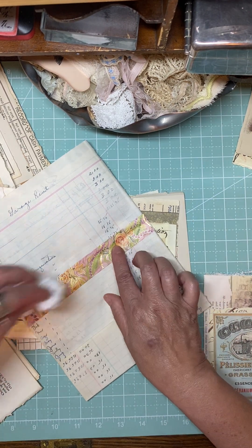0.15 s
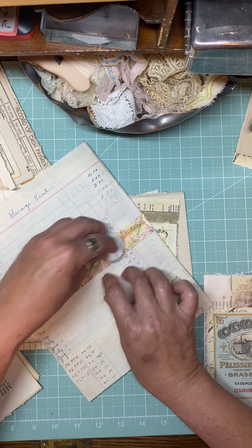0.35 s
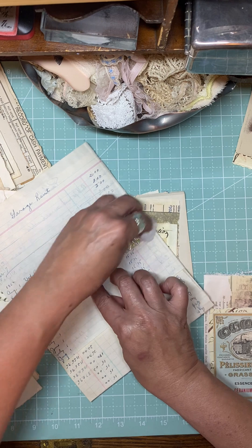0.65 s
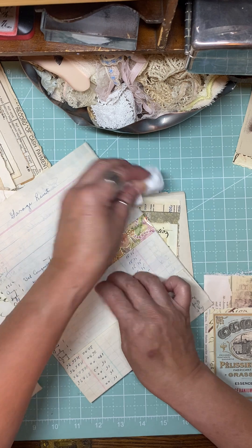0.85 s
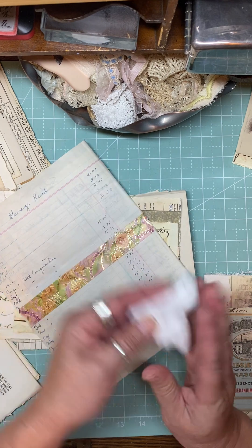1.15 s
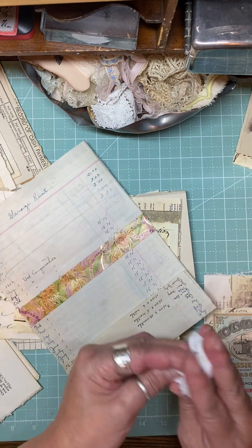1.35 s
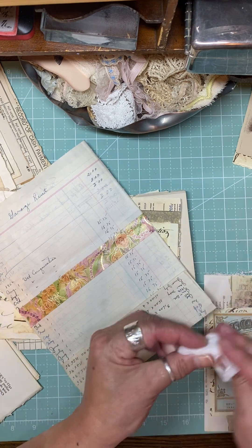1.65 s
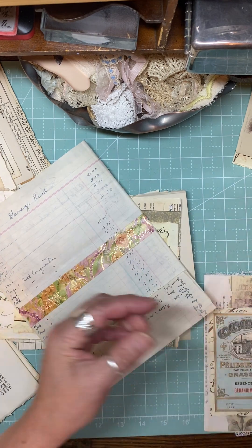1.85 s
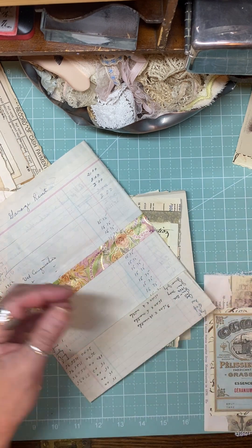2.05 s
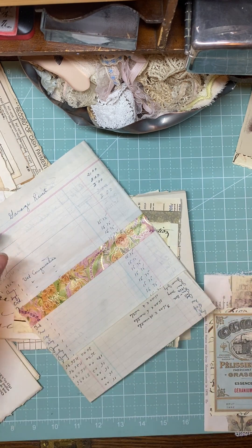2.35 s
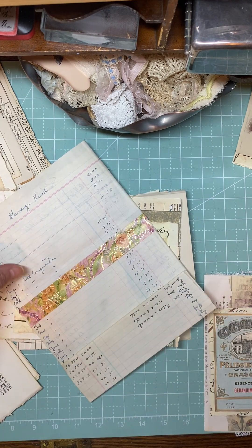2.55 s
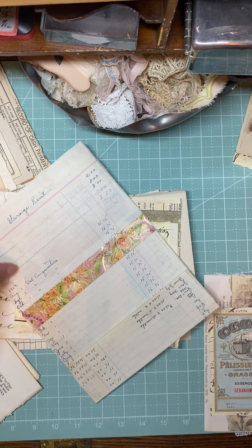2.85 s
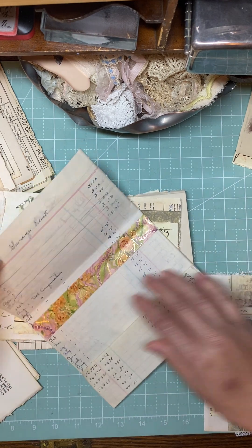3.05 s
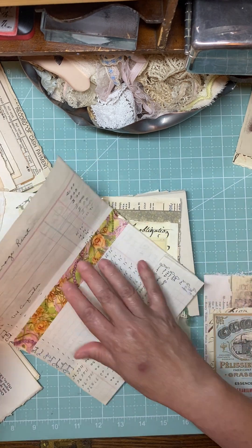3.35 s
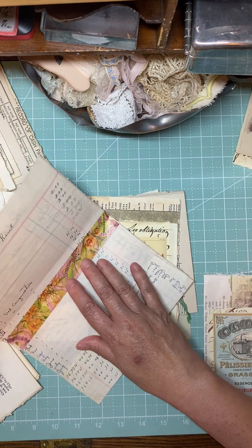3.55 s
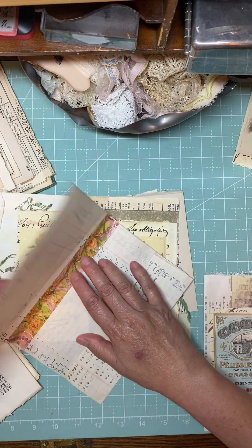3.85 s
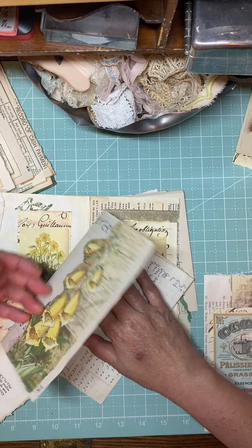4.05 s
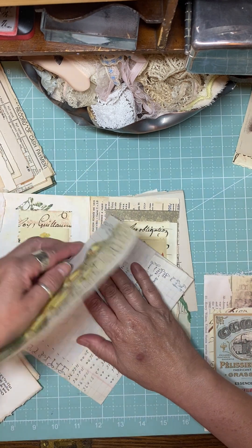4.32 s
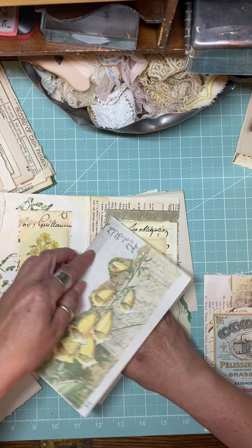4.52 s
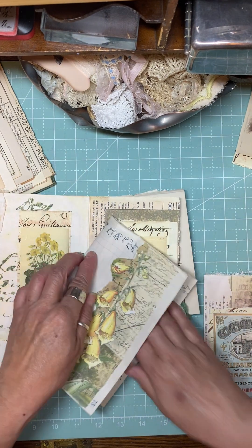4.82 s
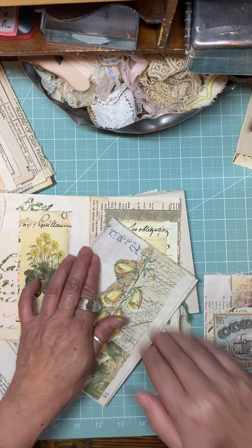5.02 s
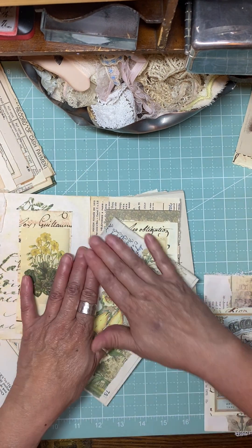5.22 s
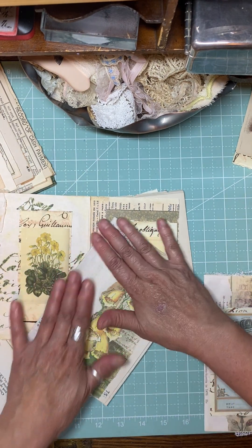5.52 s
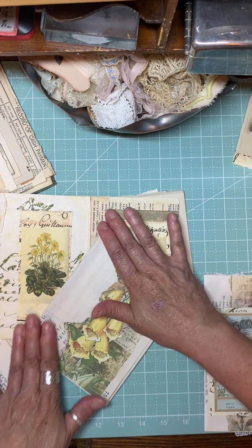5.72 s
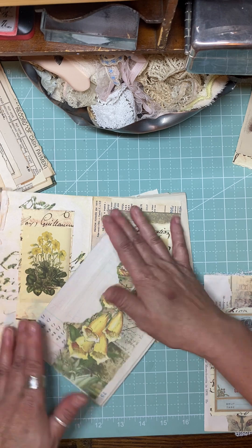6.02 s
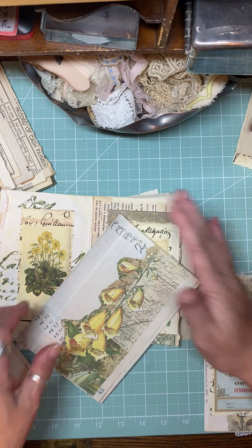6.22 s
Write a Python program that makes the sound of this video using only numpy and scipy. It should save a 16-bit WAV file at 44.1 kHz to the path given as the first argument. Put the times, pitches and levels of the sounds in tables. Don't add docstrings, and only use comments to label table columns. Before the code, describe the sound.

Dry, intimate handling of a stiff paper sheet on a cutting mat, recorded very near. Wiping scrapes and light knocks come first, then tiny cloth rustles and a lull with low fan hum. Crisp crackling rises as the page is lifted and folded, with dull air flaps, crease ticks and two sudden loud cracks, easing into long soft hand strokes that fade out.

```python
import sys
import numpy as np
from scipy import signal
from scipy.fft import rfft, irfft, next_fast_len
from scipy.io import wavfile
from scipy.ndimage import uniform_filter1d, map_coordinates

SR = 44100
rng = np.random.default_rng(int(sys.argv[2]) if len(sys.argv) > 2 else 0)


def generate_wav(sig):
    pcm = np.round(np.clip(np.atleast_2d(sig).T, -1, 1) * 32767).astype(np.int16)
    wavfile.write(sys.argv[1], SR, pcm)


def decibels_to_gain(level_db):
    exponent = np.asarray(level_db, float) / 20
    return 10 ** exponent


N = 281358

# pitch_hz, level_db (per Hz)
FLAP = [(300, -20), (500, -1), (800, 0), (1100, -11), (2000, -46)]
# full_speed_s, swell_s, fade_s, flutter_db, deep_push_db (re flutter)
SWINGS = [(.09, 0.096, 0.042, -69.5, -9), (.31, .03, .04, -70, -6), (.41, .01, .03, -66, 0),
          (.51, .04, .03, -66, -6), (.78, .06, .04, -66, -6), (.91, .04, .06, -70, -6),
          (.56, 0.042, 0.05, -65, -6), (2.21, 0.044, 0.067, -82, 24.5), (2.77, 0.073, 0.05, -67.5, 3),
          (2.99, 0.11, .1, -73.5, -5), (3.228, 0.06, 0.12, -63.5, -2), (3.49, 0.12, 0.085, -66.5, 7.5),
          (3.89, .03, .03, -65, -6), (4.045, .04, .03, -61, -3), (4.11, .03, .07, -66, -3),
          (4.255, .03, .04, -69, 0), (3.934, 0.01, 0.032, -53, 4), (3.975, 0.015, 0.04, -59.5, -3),
          (4.295, 0.01, .055, -55.5, 9), (4.335, 0.035, 0.032, -48.5, 2.5), (4.41, .06, 0.074, -66, -7.5),
          (4.52, 0.011, 0.053, -43, -9), (4.626, 0.017, 0.23, -60.5, -6.5), (4.7, 0.079, .03, -57.5, 4),
          (4.72, 0.009, 0.019, -43.5, -9), (4.8, 0.0086, 0.048, -56, -0.5), (4.85, 0.032, 0.17, -58.5, -5),
          (5.11, 0.11, 0.1, -62.5, -8), (5.25, 0.025, 0.12, -67, 6), (6.24, .08, 0.11, -72, -5.5)]


def unit(x):
    return x / np.sqrt(np.mean(x ** 2) + 1e-20)


def along(points, hz):
    f, v = np.transpose(points)
    return np.interp(np.log(hz + 1), np.log(f + 1), v)


def curves(rows):
    s, *cols = np.transpose(rows)
    return [np.interp(np.arange(N) / SR, s, c, -120, -120) for c in cols]


def wobble(rate):
    knots = rng.standard_normal(int(N * rate / SR) + 4)
    return map_coordinates(knots, [np.arange(N) * rate / SR])


def filtered(x, response):
    m = next_fast_len(N + SR // 2)
    return irfft(rfft(x, m) * response(np.fft.rfftfreq(m, 1 / SR)), m)[..., :N]


def colour(points):
    return lambda hz: decibels_to_gain(along([(0.92, -120)] + list(points), hz))


def resonances(modes):
    def response(f):
        total = 0
        for k, (centre, width, db) in enumerate(modes):
            damping = 1j * f * width
            total = total + (-1) ** k * decibels_to_gain(db) * damping / (centre * centre - f * f + damping)
        return total
    return response


def strokes(rows):
    s, swell, fade, db, companion_db = np.transpose(rows)[:, :, None]
    t = np.arange(0, N + 64, 64) / SR
    away = np.where(t < s, (s - t) / swell, (t - s) / fade).clip(0)
    gain = decibels_to_gain(db - 20 * away ** 1.48)
    layers = (gain, gain * decibels_to_gain(companion_db))
    return np.array([np.interp(np.arange(N) / SR, t, g.sum(axis=0)) for g in layers])


def slips(rate, spread_db, clump_db, patchy_db=0.5):
    slipping = rng.random(N) < rate / SR
    size = slipping * decibels_to_gain(spread_db * np.minimum(rng.exponential(size=N), 3))
    grains = (1 + size) * decibels_to_gain(clump_db * wobble(45)) * rng.standard_normal((2, N))
    z = signal.stft(grains, nperseg=512)[2]
    field = uniform_filter1d(rng.standard_normal(z.shape[1:]), size=7, axis=0)
    field = uniform_filter1d(field, size=12, axis=1)
    return signal.istft(z * decibels_to_gain(patchy_db * unit(field)), nperseg=512)[1][:, :N]


def hands():
    # pitch_hz, level_db (per Hz)
    fibres = [(1000, -30), (2000, -11), (3500, -4.5), (5000, -1), (7000, 0), (10000, -1), (12500, -3.5),
              (15500, 2.5)]
    # pitch_hz, width_hz, level_db
    sheet = [(2300, 1510, 1.5), (3223, 3700, 0.5), (5920, 3400, -5.5)]
    # pitch_hz, width_hz, level_db
    gap = [(1400, 1500, 0)]
    # full_speed_s, swell_s, fade_s, hiss_db, pressure_db (crackle re hiss)
    wiping = [(.05, 0.98, 0.14, -60.5, -1), (.28, 0.18, 0.18, -91.5, 19), (.4, 0.14, 0.26, -59, -0.5),
              (.8, .06, .09, -67, 2)]
    crumpling = [(1.22, 0.072, 0.15, -72.5, -4), (1.37, 0.072, 0.16, -78.5, 3.5),
                 (1.57, 0.056, 0.14, -68, -5.5), (1.69, 0.027, 0.031, -67.5, -2),
                 (1.87, 0.093, 0.069, -70.5, 0), (1.97, 0.065, 0.03, -73.5, 6),
                 (2.09, 0.038, .14, -65.5, -4)]
    lifting = [(2.69, 0.03, .05, -63, -27), (2.73, 0.013, 0.028, -63, 5.5), (2.78, 0.03, 0.053, -49, -6),
               (2.91, 0.063, 0.22, -48, -8), (3.1, 0.25, 0.17, -73, 13.5), (3.21, 0.1, 0.027, -54.5, -5),
               (3.33, 0.15, 0.026, -55.5, -1.5), (3.435, 0.0038, 0.11, -59, 3.5),
               (3.49, 0.058, 0.069, -52, 2.5), (3.55, 0.11, 0.062, -55, -2),
               (3.92, 0.029, 0.02, -50.5, 1.5), (4.04, 0.49, 0.055, -74, 9)]
    folding = [(4.16, 0.0087, 0.27, -63, -8), (4.32, 0.11, 0.07, -65, 10.5), (4.44, 0.067, 0.09, -84, 13),
               (4.52, 0.0092, 0.19, -64.5, 3.5), (4.64, 0.022, 0.13, -61, 1.5),
               (4.71, 0.13, 0.4, -58, -0.5), (4.78, 0.12, 0.083, -51.5, -2.5), (4.9, 0.2, 0.04, -57.5, 12),
               (4.955, .07, 0.074, -71.5, 8), (5.02, 0.083, .1, -70, 6.5), (5.08, 0.066, 0.068, -60.5, 3)]
    smoothing = [(5.22, 0.091, .1, -75, 4.5), (5.28, 0.032, 0.063, -50.5, -8), (5.46, 0.087, 0.24, -49, -5),
                 (5.6, 0.15, 0.15, -47.5, -9.5), (5.93, 0.07, 0.054, -76.5, 8.5),
                 (6.06, 0.1, 0.085, -54, -5.5), (6.28, 0.12, 0.37, -87.5, 10)]
    pressing = [(.57, 0.08, 0.5, -61.5, -5.5), (.84, 0.58, 0.012, -57, -3.5), (.7, 0.05, 0.16, -61.5, -12),
                (1.04, 0.53, 0.17, -86, 19), (3.76, 0.065, 0.093, -72, -2.5),
                (5.72, 0.17, 0.071, -54.5, -9.5), (5.8, 0.2, 0.038, -63, 2.5)]
    actions = [(wiping, -0.5), (crumpling, -14), (lifting, -3.5),
               (folding, -0.5), (smoothing, -1.7), (pressing, -7.5)]
    moves = [(strokes(rows), gap_db) for rows, gap_db in actions]
    speed, pressure = sum(move for move, _ in moves)
    air = sum(decibels_to_gain(gap_db) * move[1] for move, gap_db in moves)
    air = air + decibels_to_gain(17.5) * strokes(SWINGS)[0] ** 1.355

    def sheet_response(f):
        return resonances(sheet)(f) / (1 + (1500 / (f + 1)) ** 4)

    def gap_response(f):
        return resonances(gap)(f) ** 2 / (1 + (850 / (f + 1)) ** 6)

    hiss = unit(filtered(slips(800, spread_db=4.2, clump_db=0.9, patchy_db=1.5), colour(fibres)))
    crackle = unit(filtered(slips(250, spread_db=5.5, clump_db=1.9, patchy_db=2), sheet_response))
    hollow = unit(filtered(slips(150, spread_db=4, clump_db=2, patchy_db=1.8), gap_response))
    return decibels_to_gain(1.0) * speed * hiss + decibels_to_gain(-5.0) * pressure * crackle + decibels_to_gain(-7) * air * hollow


def fan():
    # pitch_hz, level_db (re main tone)
    motor_tones = [(36.7, -9), (58.8, -0.5), (119, -5.5), (240.5, -13)]
    # time_s, level_db
    motor_level = [(0.0, -56.5), (1.24, -53.5), (1.74, -52.5), (2.54, -52.5), (3.55, -57), (4.42, -56),
                   (4.6, -58.5), (5.26, -53), (5.45, -57.5), (6.1, -55.5), (6.38, -53.5)]
    # pitch_hz, width_hz, level_db
    room_modes = [(36.4, 4.6, -6.5), (57.5, 6.1, -4), (91, 32.5, -10.5), (143.2, 14.4, -8), (182.5, 5, -17),
                  (205.2, 10, -17.5), (250.1, 9.65, -13), (350, 15.8, -17), (390, 21, -22),
                  (497.2, 18.6, -25.5), (600, 11, -44.5)]
    # pitch_hz, level_db (per Hz)
    far_hiss = [(500, 6), (800, -9), (1200, -17), (1800, -30), (2700, -27), (3600, -31.5), (4800, -20.5),
                (6500, -34.5), (9000, -32), (12000, -49.5), (15500, -36)]
    t = np.arange(N) / SR
    tones = 0
    for hz, db in motor_tones:
        strength = decibels_to_gain(db + 2.8 * wobble(9))
        tones = tones + strength * np.sin(2 * np.pi * hz * t + 1.31 * wobble(5.5))
    motor = decibels_to_gain(curves(motor_level)[0] + 1.5) * tones * [[1], [0]]
    air = decibels_to_gain(-53.5) * unit(filtered(rng.standard_normal((2, N)), resonances(room_modes)))
    hiss_colour = colour([(300, -5.5)] + list(far_hiss))
    hiss = decibels_to_gain(-78.0) * unit(filtered(rng.standard_normal((2, N)), hiss_colour))
    return motor + air + hiss


def flaps():
    # pitch_hz, level_db (per Hz)
    push_colour = [(120, -25), (220, -1.5), (350, 0.5), (500, -2), (800, -41.5)]

    def lumps(points):
        return unit(filtered(slips(120, spread_db=4, clump_db=3, patchy_db=3.5), colour(points)))

    flutter, push = strokes(SWINGS)
    return decibels_to_gain(0.5) * flutter * lumps(FLAP) + decibels_to_gain(-3.0) * push * lumps(push_colour)


def taps():
    # time_s, peak_db, pitch_hz
    light_taps = [(0.021, -44, 1610), (0.035, -46, 1290), (0.071, -38.5, 1290), (0.094, -48.5, 635),
                  (0.315, -43.5, 1530), (0.532, -43, 1280), (0.556, -50, 1270), (0.8, -40.5, 1360),
                  (0.837, -43, 1300), (0.896, -43.5, 1330), (0.96, -46, 1170), (2.726, -49, 1380),
                  (2.75, -53, 1020), (3.224, -44, 1160), (3.268, -39.5, 1270), (3.973, -52, 815),
                  (4.018, -54, 630), (4.041, -55, 900), (4.161, -50, 1390), (4.238, -45, 1420),
                  (4.267, -44, 1470), (4.332, -52, 790), (4.682, -40, 1300), (4.046, -50, 1990)]
    # time_s, peak_db, pitch_hz
    knocks = [(0.387, -44, 1400), (0.69, -30, 5520), (0.2435, -43, 4200), (0.244, -48, 1050),
              (0.858, -52, 820), (2.197, -50, 516), (2.22, -47.5, 390), (2.424, -59, 2700),
              (2.434, -60, 2300), (2.452, -59, 2540), (2.462, -64, 2700), (2.477, -65, 2500),
              (3.932, -36.5, 310), (3.938, -40, 477), (4.291, -37.5, 326), (4.537, -38, 500),
              (4.624, -44, 875), (4.323, -38, 440), (4.337, -38, 520), (4.521, -38, 518)]
    t = np.arange(SR // 8) / SR
    out = np.zeros((2, N + len(t)))
    for s, db, hz in list(light_taps) + list(knocks):
        waver = np.cumsum(rng.standard_normal(len(t))) * 0.045
        dull = uniform_filter1d(rng.standard_normal(len(t)), size=int(SR / hz / 4) + 1)
        contact = unit(dull - uniform_filter1d(dull, size=int(SR / hz)))
        tick = decibels_to_gain(db - 14 - 60 * t / 0.0091) * contact
        t60 = 31 / hz
        swell = (1 - np.exp(-t * hz)) * decibels_to_gain(db - 5.5 - 60 * t / t60)
        out[0, round(s * SR):][:len(t)] += swell * np.sin(2 * np.pi * hz * t + waver) + tick
    return out[:, :N]


def scuffs():
    # time_s, length_s, level_db, pitch_hz, width_hz
    flat_scuffs = [(.071, .01, -58, 6000, 6000), (.092, .014, -64, 2400, 1800), (.15, .2, -77, 800, 200),
                   (.585, .13, -72, 830, 200), (.798, .006, -60, 1300, 2200), (.92, .2, -79, 800, 200),
                   (.095, 0.016, -62.5, 1400, 900), (.134, .006, -69, 1720, 1400),
                   (.177, .012, -72, 2000, 1800), (.233, .006, -62, 1700, 1200),
                   (.333, 0.02, -58, 4800, 2570), (.353, .006, -60, 2400, 2000),
                   (.362, .03, -59, 5430, 1200), (.58, .03, -60, 3300, 900), (.735, .075, -58, 5570, 1400),
                   (.838, .005, -49.5, 3930, 900), (.897, .006, -64, 3000, 1000),
                   (.959, .01, -64, 2600, 1200), (.995, .03, -71, 2500, 900), (1.04, 0.044, -70, 2400, 700),
                   (1.1, 0.17, -78.5, 2440, 1200), (1.397, .006, -74, 6000, 7000),
                   (1.55, .14, -82, 3700, 900), (1.695, 0.011, -74.5, 1400, 900),
                   (1.85, 0.054, -71.5, 5800, 1400), (1.96, .012, -73, 2800, 2400),
                   (2.07, 0.1, -71, 6800, 2400), (2.195, .03, -71, 620, 300), (2.28, .015, -79, 900, 400),
                   (2.42, .05, -86, 1250, 400), (2.42, 0.028, -80, 2400, 900), (2.45, .015, -76, 2380, 900),
                   (5.382, .008, -63, 3020, 1400), (5.42, 0.067, -65, 1320, 600),
                   (5.51, 0.048, -63, 1400, 600), (5.874, 0.0082, -76, 3180, 1190),
                   (6.24, 0.13, -81, 2517, 600), (6.25, 0.083, -81.5, 1515, 500)]
    loose_scuffs = [(2.657, 0.017, -70, 3800, 2620), (2.685, .02, -66, 7600, 2000),
                    (2.708, 0.044, -66.5, 1400, 450), (2.775, .075, -64.5, 1400, 450),
                    (2.78, 0.017, -57, 3620, 1200), (2.825, 0.028, -58, 4800, 3000),
                    (2.9, 0.18, -66, 1350, 500), (2.995, 0.011, -64, 2000, 1200),
                    (3.06, 0.032, -67, 2500, 1200), (3.195, 0.045, -60, 2620, 1400),
                    (3.21, .018, -54.5, 6400, 1800), (3.45, .03, -56, 1250, 600),
                    (3.458, .02, -54, 3500, 900), (3.565, 0.027, -64, 1300, 600),
                    (3.705, 0.032, -79, 3280, 600), (3.769, 0.033, -68, 6500, 5000),
                    (3.806, 0.017, -53.5, 1980, 2400), (3.862, 0.026, -67, 1070, 600),
                    (3.975, .008, -60, 1800, 2400), (4.018, 0.011, -62, 900, 700),
                    (4.05, 0.0098, -64, 2200, 2400), (4.228, .02, -62, 2500, 3000),
                    (4.266, .008, -64, 4000, 5000), (4.42, 0.01, -66, 1300, 1600),
                    (4.088, 0.06, -65, 800, 220), (3.811, .012, -53, 1050, 400),
                    (3.822, .025, -66, 1500, 1800), (4.153, .012, -63, 1400, 1300),
                    (4.172, .025, -67, 1500, 400), (4.43, .04, -72, 3200, 900),
                    (3.926, .02, -53, 1100, 900), (3.95, .006, -60, 1800, 2400),
                    (4.608, .005, -60, 1500, 1500), (4.865, 0.013, -46, 2600, 1400),
                    (4.862, 0.028, -45, 1350, 450), (4.888, 0.021, -44.5, 2430, 700),
                    (4.888, 0.022, -46, 4100, 800), (4.89, 0.014, -54, 1200, 500),
                    (4.914, 0.0075, -47.5, 5200, 3500), (4.914, 0.038, -51.5, 1450, 600),
                    (4.952, 0.021, -53.5, 1620, 600), (4.972, 0.019, -55, 1560, 500)]
    size = SR // 4
    hz = np.fft.rfftfreq(size, 1 / SR)
    out = np.zeros((2, N + SR))
    for s, length, db, centre_hz, width_hz in list(flat_scuffs) + list(loose_scuffs):
        u = np.arange(size) / SR / length
        grip = decibels_to_gain(1.5 * unit(uniform_filter1d(rng.standard_normal(size), size=90)))
        pocket = resonances([(centre_hz, width_hz, 0)])(hz) ** 2
        rub = irfft(rfft(rng.standard_normal((2, size))) * pocket, size)
        shape = np.minimum(u / 0.15, 1) * decibels_to_gain(-14 * u ** 3)
        out[:, round(s * SR):][:, :size] += decibels_to_gain(db) * shape * grip * unit(rub)
    return out[:, :N]


def creases():
    # time_s, peak_db, ring_hz, crack_db (re peak)
    flat_creases = [(0.0724, -43.5, 2100, -4.5), (0.144, -43, 3970, -15), (0.243, -37.5, 2230, -39),
                    (0.406, -30.5, 2190, -28), (0.556, -26.5, 1600, -15.5), (0.69, -56, 5530, -12),
                    (0.838, -36, 1310, -29), (0.856, -48, 1690, -9), (2.81, -42.5, 1420, -20),
                    (3.48, -40, 4200, -11), (3.516, -39, 2170, -17.5), (3.528, -37.5, 1930, -18.5),
                    (5.247, -45, 1260, -12), (5.259, -39.5, 1710, -8), (5.927, -48.5, 2276, -25.5),
                    (5.975, -51, 1747, -17.5), (6.036, -43.5, 1610, -12.5), (3.546, -42.5, 5000, -7)]
    loose_creases = [(3.422, -46.5, 1040, -29), (3.806, -39, 1110, -16.5), (4.289, -38, 2160, -14),
                     (4.318, -38, 2300, -15), (4.421, -54, 1500, -26), (4.332, -33, 1670, -26.5),
                     (4.513, -36, 1480, -22), (4.519, -29, 1200, -28), (4.631, -32, 2380, -34),
                     (4.6312, -32, 1250, -30), (4.624, -40, 1500, -32), (4.671, -38, 1400, -23),
                     (4.904, -33, 2453, -24), (4.898, -36, 4100, -20), (4.868, -37, 2600, -20),
                     (4.917, -38, 3500, -14), (4.338, -38, 1190, -25.5), (4.54, -41.5, 910, -25.5)]
    # pitch_hz, level_db (per Hz)
    desk = [(500, -11.5), (800, -11.5), (1200, 3), (1800, -2), (2700, 5.5), (3600, -2), (4800, 5),
            (6500, -5.5), (9000, -17.5), (12000, -8), (15500, -15.5)]
    size = SR // 4
    t = np.arange(size) / SR
    hz = np.fft.rfftfreq(2 * size, 1 / SR)
    crack_gain = colour([(2500, -25), (5500, 0), (12000, -3), (16000, -5)])(hz)
    thump_gain = colour(FLAP)(hz)
    desk_gain = colour([(250, -30)] + list(desk))(hz)

    def shaped(gain):
        return unit(irfft(rfft(rng.standard_normal((2, size)), 2 * size) * gain)[:, :size])

    out = np.zeros((2, N + size))
    rows = [(*row, -51) for row in flat_creases] + [(*row, -19) for row in loose_creases]
    for s, db, ring_hz, crack_db, thump_db in rows:
        thump_db = thump_db - 4 * np.log2(ring_hz / 1500)
        t60 = np.clip(48 / ring_hz, 0.005, 0.3)
        cycles = t * ring_hz
        swell = cycles / 2.45 * np.exp(1 - cycles / 1.73)
        ring = decibels_to_gain(-3.5) * swell ** 2 * np.cos(2 * np.pi * (cycles - 1.3)) * [[-1], [0]]
        rise = 1 - np.exp(-(cycles / 0.54) ** 2)
        crack = decibels_to_gain(crack_db + 6.5 - 60 * t / 0.023) * shaped(crack_gain)
        thump = decibels_to_gain(thump_db - 4.0 - 60 * t / 0.053) * shaped(thump_gain)
        fade = decibels_to_gain(-7.0 - 60 * t / t60) + decibels_to_gain(-38.5 - 60 * t / 0.12)
        answer = fade * shaped(desk_gain / (1 + (hz / (3 * ring_hz)) ** 2))
        out[:, round(s * SR):][:, :size] += decibels_to_gain(db) * (ring + rise * (crack + thump + answer))
    return out[:, :N]


def buckles():
    # time_s, level_db, ring_hz, body_hz, top_hz
    snaps = [
        (4.713, -4, 2580, 1400, 16800),
        (4.8098, -1.6, 3050, 600, 13600),
    ]
    size = SR // 2
    t = np.arange(size) / SR
    hz = np.fft.rfftfreq(2 * size, 1 / SR) + 1

    def hump(centre_hz, octaves):
        return 1 / (1 + (np.log2(hz / centre_hz) / octaves) ** 2) ** 2

    def echoes(gain):
        return rfft(gain * (t > 0.0004) * rng.standard_normal((2, size)), 2 * size)

    late = np.exp(2j * np.pi * (800 / hz - 0.005 * hz)) * (hz > 150)
    direct = np.array([hz ** 0, 1 / (1 + (11500 / hz) ** 10)])
    out = np.zeros((2, N + 2 * size))
    for s, db, ring_hz, body_hz, top_hz in snaps:
        body = decibels_to_gain(-1) * hump(body_hz, 1.0)
        overtone = decibels_to_gain(-10.5) * hump(6500, 0.22)
        crack = decibels_to_gain(-7.5) * hump(10600, 0.5)
        pulse = late * (hump(ring_hz, 0.9) + body + overtone + crack) / (1 + (hz / top_hz) ** 16)
        first = echoes(decibels_to_gain(-26 - 60 * t / 0.016))
        later = echoes(decibels_to_gain(-27 - 60 * t / 0.04) + decibels_to_gain(-40 - 60 * t / 0.17))
        later = later / (1 + (hz / 5500) ** 3) / (1 + (450 / hz) ** 4)
        snap = irfft(pulse * (first + later + direct)) / np.abs(irfft(pulse)).max()
        out[:, round((s - 0.005) * SR):][:, :2 * size] += decibels_to_gain(db) * snap
    return out[:, :N]


def left_right(pair, alike):
    # pitch_hz, lead_radians
    lead = [(400, 0), (950, -.6), (1400, 0), (1900, .2), (2800, 1.2), (3900, .4), (4750, 3.1), (5400, 6.8),
            (7750, 7.8), (11000, 8.6), (12800, 9.4)]
    # pitch_hz, left_minus_right_db
    lean = [(130, 0), (220, 2.5), (400, 4), (800, 1.5), (1200, -1), (2700, -2.5), (4500, 0)]

    def spread(hz):
        turn = np.arccos(np.clip(along(alike, hz), 0, 1)) / 2
        return np.array([np.cos(turn), np.sin(turn)])

    def channel_response(hz):
        half_db = along(lean, hz) / 2
        return np.array([decibels_to_gain(half_db), decibels_to_gain(-half_db) * np.exp(-1j * along(lead, hz))])

    mid, side = filtered(pair, spread)
    return filtered(np.array([mid + side, mid - side]), channel_response)


def scene():
    # pitch_hz, likeness (0-1)
    near = [(400, .5), (900, .7), (1400, .98), (2100, .97), (3200, .55), (4500, .5), (4780, .97),
            (5100, .45), (5700, .82), (12300, .82), (13000, .985)]
    close = [(300, .9), (500, .94), (1500, .93), (2500, .95), (5000, .9), (6000, .96), (12300, .9),
             (13000, .9)]
    far = [(60, .998), (130, .99), (290, .85), (450, .3), (1400, .1), (2000, .6), (15000, .6)]
    paper = flaps() + creases() + taps() + buckles() + scuffs()
    return left_right(hands(), near) + left_right(paper, close) + left_right(fan(), far)


def roll_off(x):
    return signal.sosfilt(signal.butter(12, 16800, fs=SR, output="sos"), x)


def record(dry):
    def band(hz):
        return 1 / np.sqrt((1 + (29 / (hz + 1)) ** 24) * (1 + (hz / 16500) ** 60))

    mix = filtered(dry, band)
    return roll_off(mix)


dry = scene()
out = record(dry)
generate_wav(out)
```